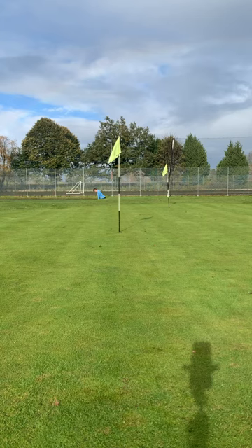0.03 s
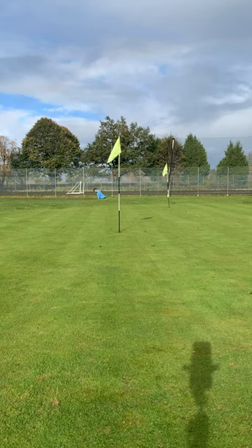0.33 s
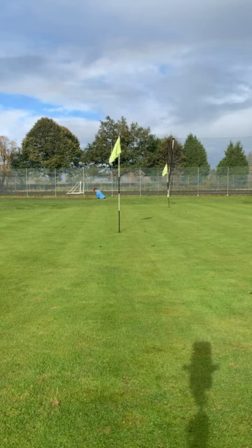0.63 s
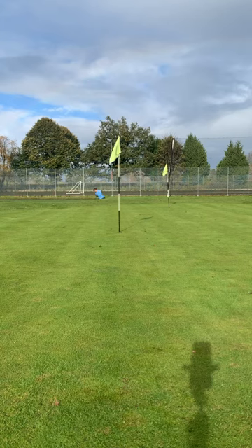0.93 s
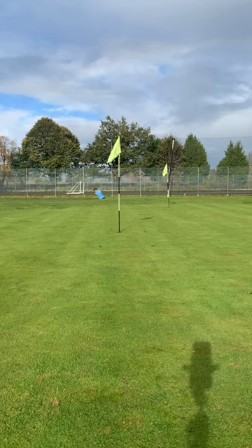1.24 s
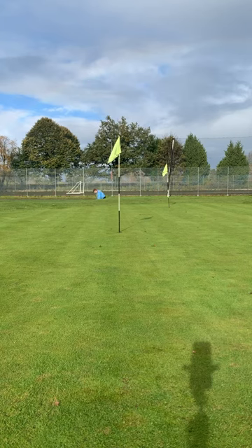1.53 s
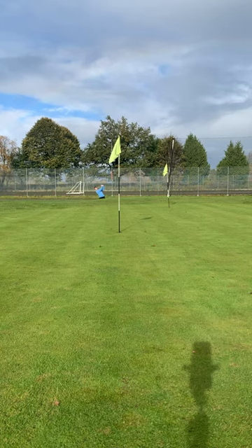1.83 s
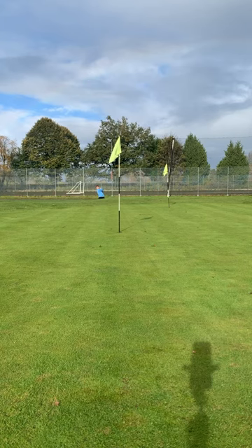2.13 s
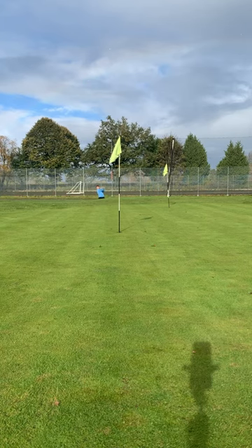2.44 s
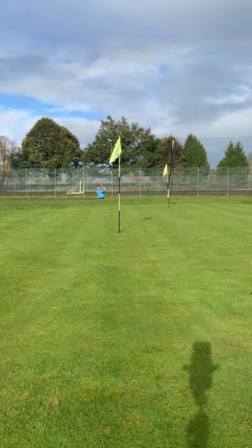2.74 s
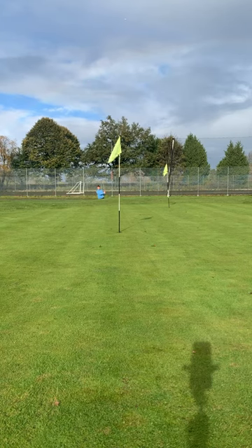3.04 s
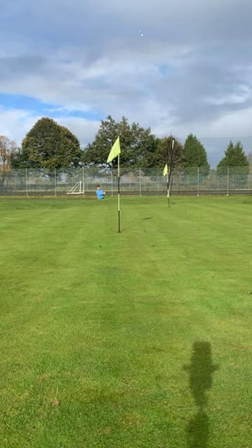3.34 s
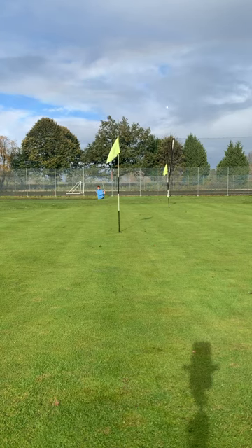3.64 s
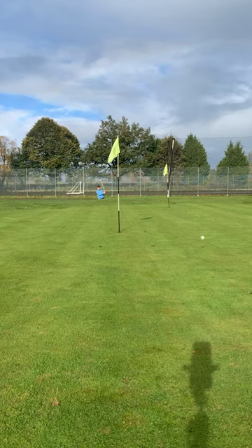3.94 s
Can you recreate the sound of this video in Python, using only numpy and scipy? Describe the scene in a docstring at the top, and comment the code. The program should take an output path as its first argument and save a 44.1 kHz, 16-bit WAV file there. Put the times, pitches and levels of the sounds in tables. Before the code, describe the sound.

Light wind buffets the microphone with a low, fluttering rumble, over a steady wash of distant traffic and a faint hiss of leaves. Two tiny ticks sound at about 1.3 and 1.6 seconds. The gusts pick up from 2.4 to 2.9 seconds and again around 3.5. At about 3.9 seconds a golf ball lands on the turf, slightly to the right, with one short, clicky thud.

```python
"""A breezy golf green

An open golf green in light wind, heard by a small microphone with two ports (left and right).
Distant traffic and trees make a steady wash; gusts buffet the microphone with a low flutter.
Two faint ticks sound nearby. Near the end a golf ball lands on the turf with one short thud:
its hard shell clicks and the grass brushes against it."""
import sys
import numpy as np
from scipy import signal
from scipy.fft import rfft, irfft, next_fast_len
from scipy.io import wavfile
from scipy.ndimage import uniform_filter1d, map_coordinates

SR = 44100
rng = np.random.default_rng(int(sys.argv[2]) if len(sys.argv) > 2 else 0)


def master(y):
    """Save y as 16-bit WAV."""
    cut = np.clip(np.atleast_2d(y).T, -1, 1)
    pcm = np.round(cut * 32767)  # scale
    wavfile.write(sys.argv[1], SR, pcm.astype(np.int16))


N = 176400  # 4 seconds

# how alike the two ports sound (frequency [Hz], likeness [0-1])
PORT_LIKENESS = [(50, 1), (170, 0.66), (300, 0.87), (540, 0.86), (950, 0.13), (1500, 0.55), (2500, 1),
                 (3700, 1), (4700, 1), (7000, 1)]
# how much louder the left port is (frequency [Hz], left minus right [dB])
PORT_BALANCE = [(150, 0.1), (350, -1), (550, -2), (950, -7), (1400, -4), (2200, -1), (3000, 0.5), (5000, 0)]
# how far the left port's wave runs ahead (frequency [Hz], lead [radians])
PORT_LEAD = [(30, -1.35), (200, -0.12), (400, -0.92), (700, -1.93), (1000, 0), (1800, 0.63), (2400, 1.84),
             (3300, 1.49), (3950, 1.5), (4700, 3), (6900, 6.5), (9000, 10), (11000, 13), (15000, 18)]
# drone of far engines (frequency [Hz], relative level [dB])
ENGINE_SPECTRUM = [(15, -23), (30, -19), (55, 0.5), (90, -3.5), (120, 2), (155, -6.5), (230, -8),
                   (340, -10), (500, -15.5), (700, -23.5), (1200, -43), (4000, -100)]
# roar of far tyres (frequency [Hz], relative level [dB])
TYRE_SPECTRUM = [(200, -21), (450, -3), (680, -2), (880, 0.5), (1100, -3), (1650, -10.5), (2300, -21),
                 (4000, -36), (9000, -89)]
# how the tyre roar swells (time [s], level [dB])
TYRE_LEVELS = [(0, -46.5), (1.0, -46.5), (1.55, -46.5), (1.8, -47.5), (2.6, -47), (3.3, -47), (3.52, -47),
               (3.64, -43.5), (3.76, -46.5), (4, -45.4)]
# hiss of air in the leaves (frequency [Hz], relative level [dB])
LEAF_SPECTRUM = [(300, -32), (1500, -4.5), (2300, 0.5), (3000, 2), (4200, -1.5), (5400, -2.5), (6500, -9),
                 (7400, -13.5), (8500, -17.5), (10000, -22), (14000, -26), (15000, -33), (16000, -44)]
# how the hiss swells; only the swing around its average counts (time [s], relative level [dB])
LEAF_SWELLS = [(0.1, -71.5), (0.14, -74), (3.49, -73), (3.75, -71), (3.88, -71)]
# breeze between the gusts (time [s], level [dB])
BREEZE_LEVELS = [(0, -40.5), (0.9, -41.5), (1.5, -42), (2.2, -43), (2.6, -44.5), (3.2, -42.5), (3.7, -47),
                 (4, -42.5)]
# gusts at the microphone (time [s], peak level [dB], half-width [s], eddies relative to the gust [dB])
WIND_GUSTS = [(0.055, -34, 0.032, 0), (0.135, -28, .02, -13), (0.38, -36, 0.018, -12),
              (0.69, -35, 0.037, -9), (0.756, -35, 0.0097, -2), (0.89, -37, 0.011, -0.5),
              (1.001, -38, 0.019, -1.5), (1.067, -32.5, 0.015, -3), (1.238, -35, 0.015, -3),
              (1.381, -31.5, .018, -4), (1.514, -35, 0.0096, -1), (2.365, -37, 0.022, -1.5),
              (2.409, -31, 0.011, -10), (2.461, -33.5, 0.0091, -0.5), (2.495, -32.5, 0.0092, -6),
              (2.55, -30.5, 0.0083, -8.5), (2.618, -27, 0.015, -19), (2.702, -28, 0.011, -6),
              (2.77, -31, 0.01, -7), (2.866, -29, 0.02, -12), (3.37, -35, 0.013, -11),
              (3.42, -28, 0.015, -6), (3.447, -28.5, 0.013, 1.5), (3.487, -26, 0.017, -1.5),
              (3.535, -36, 0.024, -11), (3.87, -34.5, 0.016, -9)]
# rumble of wind hitting the microphone (frequency [Hz], relative level [dB])
BUFFET_SPECTRUM = [(15, -37), (28, -24), (50, 2.5), (75, -0.5), (115, -5.5), (160, -18), (260, -26.5),
                   (500, -40.5), (1500, -73), (4000, -120)]
# eddies, the small swirls that gusts shed (frequency [Hz], relative level [dB])
EDDY_SPECTRUM = [(60, -15), (105, 3), (135, 1), (180, -8.5), (280, -18), (500, -39), (2000, -87)]
# faint ticks (time [s], level before filtering [dB], centre pitch [Hz], time to fade 60 dB [s])
FAINT_TICKS = [(1.3412, -57, 11000, .005), (1.591, -35.5, 720, 0.04)]
# tones of the ball's shell (frequency [Hz], level relative to the thud [dB], time to fade 60 dB [s])
SHELL_TONES = [(1590, 2.5, 0.0063), (3470, -20, 0.01), (6440, 4.5, 0.0033), (7480, -6, 0.0058),
               (11900, -20, .005), (14600, -9, 0.0034)]


def amp(db):
    """Turn decibels into a number to multiply by."""
    return 10 ** (np.asarray(db) / 20)


def unit(x):
    """Scale a signal to an average size (rms) of 1."""
    return x / np.sqrt(np.mean(x ** 2) + 1e-20)


def at_hz(table, hz):
    """Read a table between its frequencies, on a log scale."""
    frequencies, values = np.transpose(table)
    return np.interp(np.log(hz + 1), np.log(frequencies + 1), values)


def over_time(table):
    """Join a table's timed points with straight lines."""
    return np.interp(np.arange(N) / SR, *np.transpose(table))


def since(start_s):
    """Seconds since start_s, zero before it."""
    return np.maximum(np.arange(N) / SR - start_s, 0)


def wobble(per_second):
    """A smooth curve through random points."""
    points = rng.standard_normal(int(N * per_second / SR) + 4)
    return map_coordinates(points, [np.arange(N) * per_second / SR])


def filtered(x, response):
    """Multiply each frequency in x by response(hz)."""
    size = next_fast_len(N + SR // 2)
    hz = np.fft.rfftfreq(size, 1 / SR)
    return irfft(rfft(x, size) * response(hz), size)[..., :N]


def panned(x, pan_db):
    """Make the left side pan_db louder than the right."""
    return x * amp(np.array([[.5], [-.5]]) * pan_db)


def steadied(x):
    """Even out the chance swells in a noise."""
    power = uniform_filter1d(np.mean(x ** 2, axis=0), size=1500)
    return x / np.sqrt(np.abs(power) + 1e-9)


def rush(spectrum, patchy_db=0):
    """Rushing noise of rms 1 with random louder and softer patches, as the two ports hear it."""
    def split(hz):  # the more alike the ports, the more noise they share
        angle = np.arccos(np.clip(at_hz(PORT_LIKENESS, hz), 0, 1)) / 2
        return amp(at_hz(spectrum, hz)) * [np.cos(angle), np.sin(angle)]

    def ports(hz):
        phase_shift = np.exp(1j * np.outer([.5, -.5], at_hz(PORT_LEAD, hz)))
        return panned(phase_shift, at_hz(PORT_BALANCE, hz))

    grid = signal.stft(rng.standard_normal((2, N)), nperseg=1024)[2]
    patches = uniform_filter1d(rng.standard_normal(grid.shape[1:]), size=7, axis=0)  # blur in pitch
    patches = uniform_filter1d(patches, size=9, axis=1)  # blur in time
    noise = signal.istft(grid * amp(patchy_db * unit(patches)), nperseg=1024)[1][:, :N]
    shared, opposite = filtered(noise, split)
    return unit(filtered(np.array([shared + opposite, shared - opposite]), ports))


def burst(start_s, centre_hz, fade_s):
    """A broad burst of noise that fades by 60 dB in fade_s."""
    band = lambda hz: (2 * hz * centre_hz / (hz ** 2 + centre_hz ** 2)) ** 2
    noise = unit(filtered(rng.standard_normal(N), band))
    t = since(start_s)
    return filtered(noise * (t > 0) * amp(-60 * t / fade_s), band)


def traffic():
    """Far engines drone steadily while the roar of tyres gently swells."""
    engines = amp(-42) * rush(ENGINE_SPECTRUM, patchy_db=0.82)
    tyres = amp(over_time(TYRE_LEVELS)) * rush(TYRE_SPECTRUM, patchy_db=0.85)
    return engines + tyres


def trees(average_db=-60):
    """Air moving through leaves makes a soft hiss."""
    swell_db = over_time(LEAF_SWELLS)
    return amp(average_db + swell_db - swell_db.mean()) * rush(LEAF_SPECTRUM, patchy_db=1.4)


def wind(flutter_db=2.5, eddy_trim_db=-1.5):
    """Gusts ride on a fluttering breeze, buffet the microphone and shed smaller, brighter eddies."""
    t = np.arange(N) / SR
    breeze = amp(over_time(BREEZE_LEVELS) + flutter_db * wobble(per_second=18))
    wind_power, eddy_power = breeze ** 2, np.zeros(N)
    for peak_s, db, half_width_s, eddy_db in WIND_GUSTS:
        swell = np.exp(-((t - peak_s) / half_width_s) ** 2)
        wind_power += amp(db) ** 2 * swell
        eddy_power += amp(db + eddy_db) ** 2 * swell
    rumble = np.sqrt(wind_power) * steadied(rush(BUFFET_SPECTRUM))
    eddies = np.sqrt(eddy_power) * steadied(rush(EDDY_SPECTRUM))
    return rumble + amp(eddy_trim_db) * eddies


def ticks():
    """Two tiny ticks close by, the first high and the second lower."""
    return sum(amp(db) * burst(start_s, hz, fade_s) for start_s, db, hz, fade_s in FAINT_TICKS)


def ball_landing(start_s=3.9083):
    """The ball hits the turf: a thud that falls in pitch, a click of its shell and a brush of grass."""
    start_hz, end_hz, fall_s = 2790, 375, 0.00087
    thud_rise_s, thud_length_s, click_rise_s = 0.00034, 0.0055, 0.00043
    t = since(start_s)
    pitch_hz = end_hz + (start_hz - end_hz) * np.exp(-t / fall_s)
    phase = 2 * np.pi * np.cumsum(pitch_hz * (t > 0)) / SR
    thud_shape = (1 - np.exp(-t / thud_rise_s)) * np.exp(-(t / thud_length_s) ** 2)
    thud = -np.sin(phase) * thud_shape
    ring = sum(amp(db - 60 * t / fade_s) * np.sin(2 * np.pi * hz * t) for hz, db, fade_s in SHELL_TONES)
    click = (1 - np.exp(-t / click_rise_s)) ** 2 * ring
    grass = amp(-26.5) * burst(start_s + .001, centre_hz=6740, fade_s=0.027)
    return panned(amp(-22) * (thud + click + grass), pan_db=-5)  # a little to the right


def scene():
    """Everything on the green, added together."""
    return traffic() + trees() + wind() + ticks() + ball_landing()


def record(dry):
    """The sound begins after a short silence and keeps nothing above top_hz."""
    silence_s, fade_in_s, top_hz = .036, 0.00059, 16000
    fade_in = np.minimum(since(silence_s) / fade_in_s, 1)
    return filtered(dry * fade_in, lambda hz: hz < top_hz)


dry = scene()
out = record(dry)
master(out)
```